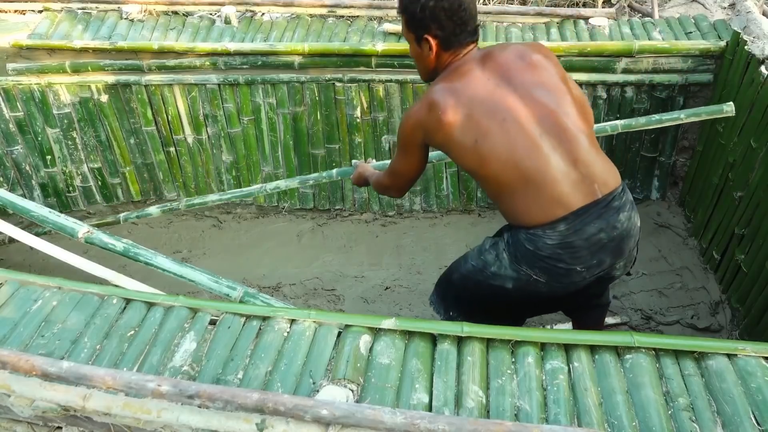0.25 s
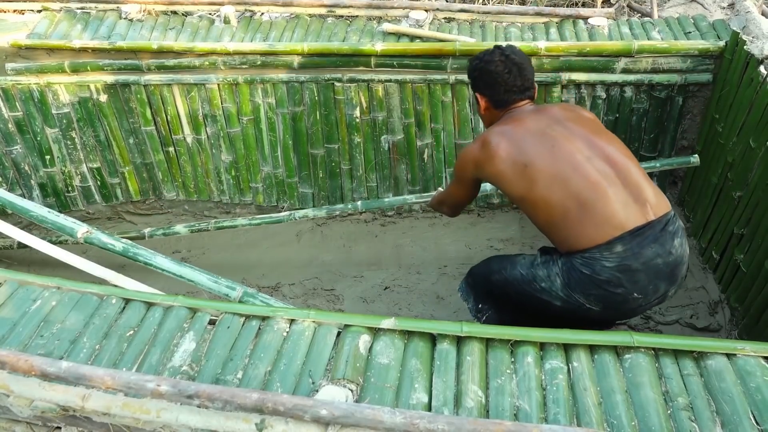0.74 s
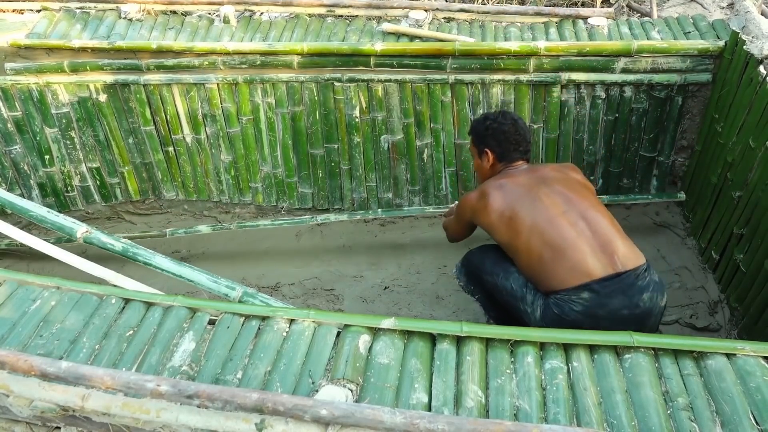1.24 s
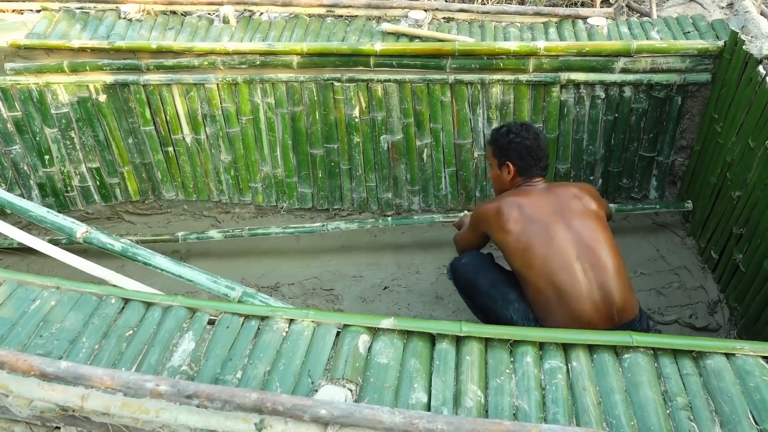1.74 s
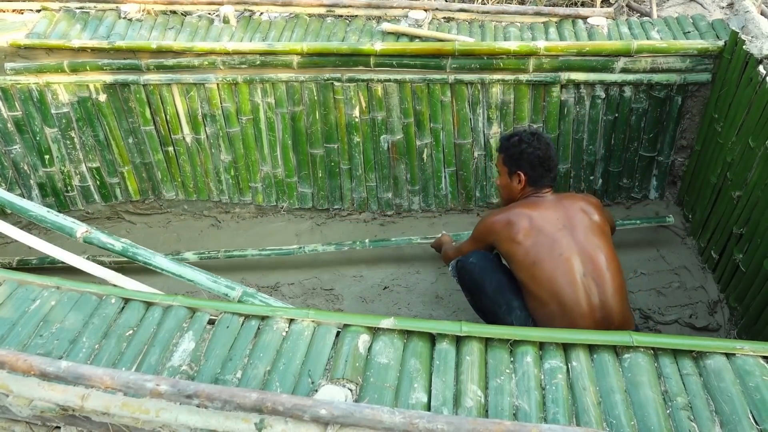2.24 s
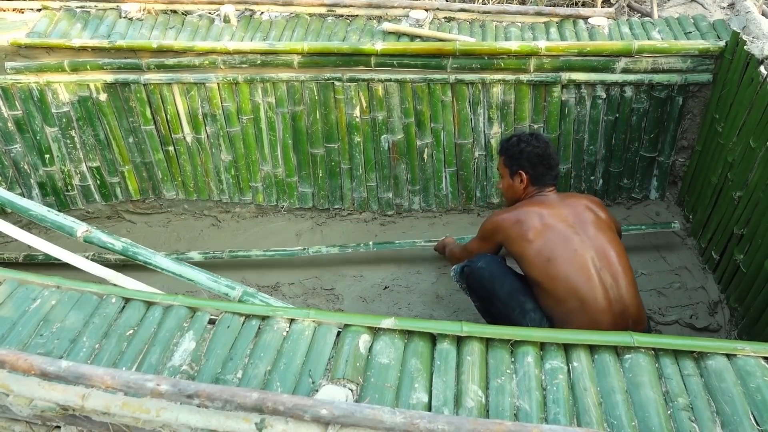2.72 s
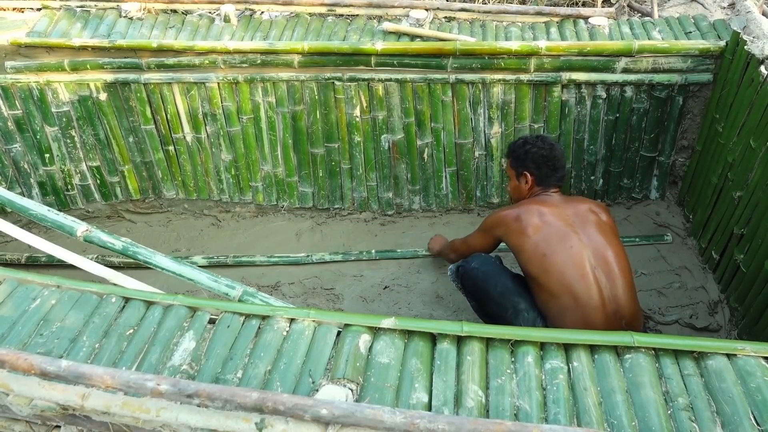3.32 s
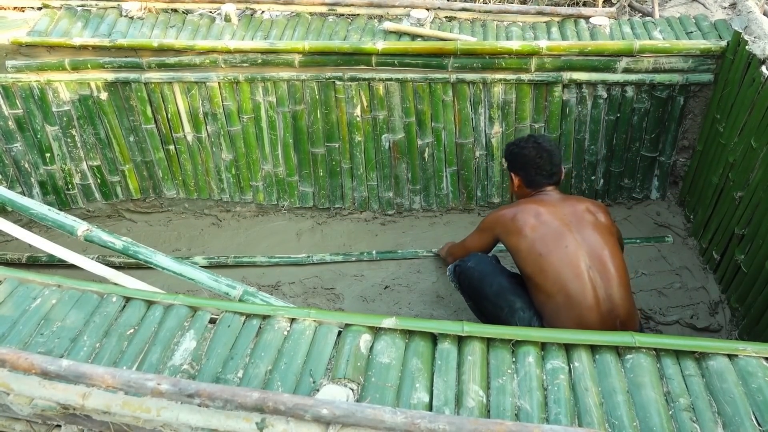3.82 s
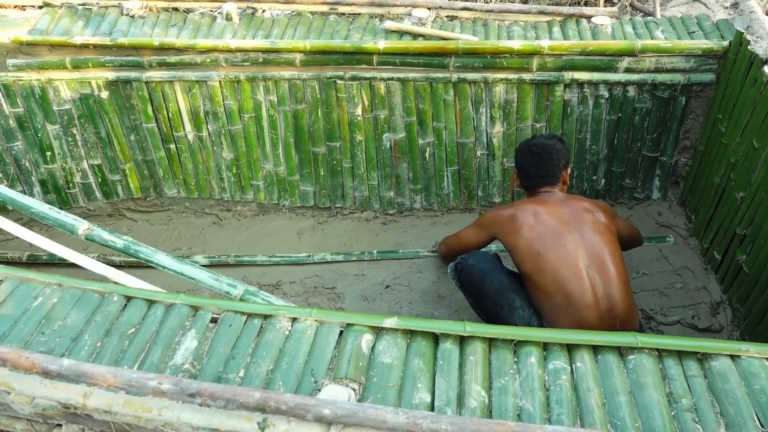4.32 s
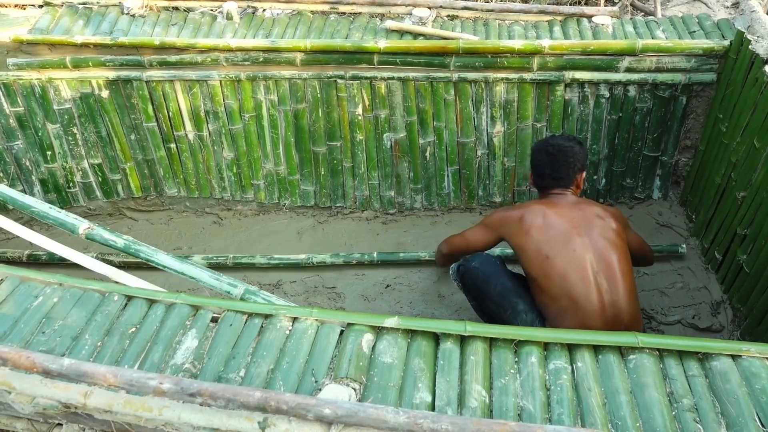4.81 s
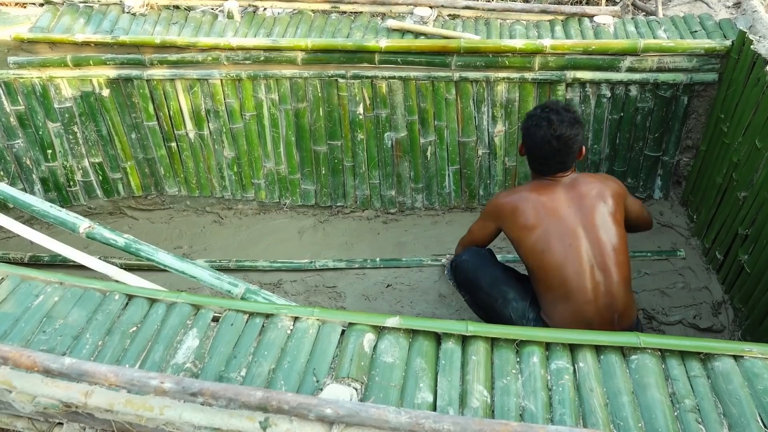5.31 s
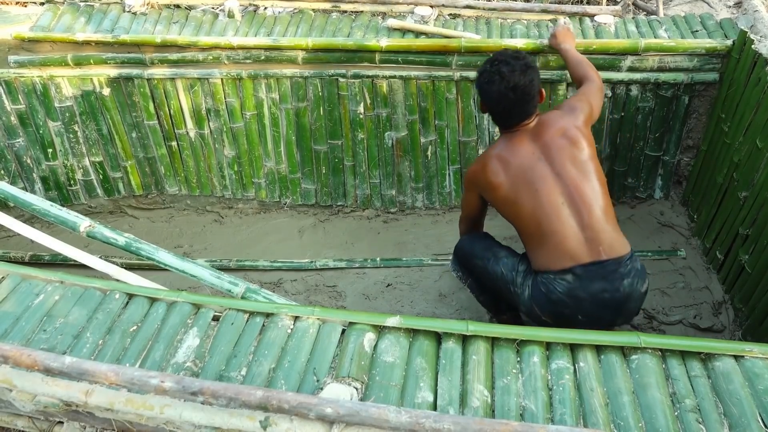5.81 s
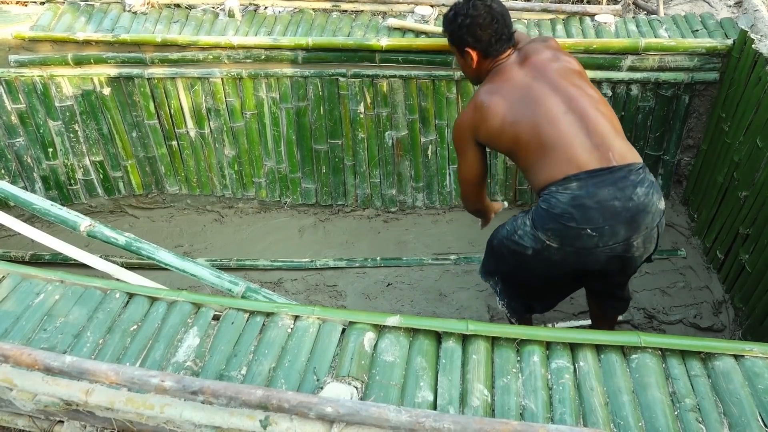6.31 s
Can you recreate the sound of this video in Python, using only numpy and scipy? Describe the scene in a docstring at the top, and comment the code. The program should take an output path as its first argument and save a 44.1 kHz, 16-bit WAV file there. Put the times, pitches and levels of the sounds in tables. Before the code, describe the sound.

Outdoors, very close, a bamboo pole is lowered into a bamboo-lined earth pit. Sharp hollow knocks crack and die at once, with short rattles against slats. Gritty scuffing builds after the first second and continues between blows, then thins while strong single knocks come more widely spaced. Soft wind rumble and faint hiss lie underneath; the hardest blows slightly overload the microphone.

```python
"""Bamboo pole laid in an earth pit

Outdoors, a long bamboo pole goes down in a pit lined with split bamboo: blows ring its modes, it shudders
on the slats, scuffs over dry soil as shaped noise, and some blows boom the hollow lining as low sines.
Wind rumbles on the microphone over a far wash and hiss, all filtered noise; midway a soft band swells
and a faint thin whistle passes. The hardest blows clip the input."""
import sys
import numpy as np
from scipy import signal
from scipy.fft import rfft, irfft, next_fast_len
from scipy.io import wavfile
from scipy.ndimage import uniform_filter1d, map_coordinates

SR = 44100
rng = np.random.default_rng(int(sys.argv[2]) if len(sys.argv) > 2 else 0)


def persist_wave(psi):
    """Save psi, clipped to +-1, as 16-bit WAV."""
    counts = np.round(np.clip(psi, -1, 1) * 32767).astype(np.int16)
    wavfile.write(sys.argv[1], SR, np.atleast_2d(counts).T)


N = 288855  # length [samples]

# Wind on the microphone, spectrum: (frequency [Hz], relative density [dB per Hz])
RUMBLE_SPECTRUM = [(15, -5.5), (30, 1.5), (42, -8), (60, -14.5), (130, -27.5), (400, -71)]
# Far outdoor wash, spectrum: (frequency [Hz], relative density [dB per Hz])
WASH_SPECTRUM = [(70, -39), (130, -1.5), (330, -4.5), (480, -1), (700, -5), (950, -7), (1800, -31)]
# Far wash, level before its random drift: (time [s], level [dB])
WASH_LEVEL = [(0, -46), (.6, -49), (3.1, -47), (3.9, -44.5), (4.1, -46), (5.6, -46), (5.9, -46),
              (6.2, -50.5)]
# Hiss, spectrum: (frequency [Hz], relative density [dB per Hz])
HISS_SPECTRUM = [(200, -9), (600, -8), (1500, -8.5), (3300, -9.5), (6000, -11.5), (8500, -13),
                 (11000, -20.5), (16000, -28)]
# Hiss, fuller while the pole is dragged, level before its random drift: (time [s], level [dB])
HISS_LEVEL = [(0, -46.5), (1.2, -43.5), (1.7, -42.5), (2.3, -43.5), (2.5, -40.5), (2.95, -39), (3.1, -43),
              (3.6, -41), (4.2, -44), (6.55, -45.5)]
# Blows of the pole on the lining: (time [s], ring peak [dB], ring [Hz], second ring [Hz],
# sharpness [dB], shudder re ring [dB], shudder's low zone re its middle [dB], shudder's middle t60 [s])
BLOWS = [(0.027, -30.5, 2280, 3120, 3, -23, -0.5, 0.057), (0.04, -27.5, 2427, 1510, -4, -17, 10, 0.058),
         (0.2147, -24, 2445, 1240, 0, -28, 17, 0.23), (0.3502, -5, 3796, 2150, -4.5, -15.5, 4.5, 0.13),
         (0.7247, 3.5, 1230, 2250, 3, -30.5, 15.5, .15), (0.8506, -29.5, 5730, 2600, 15.5, -23, 20, 0.11),
         (0.9012, -18.5, 778, 1280, -12, -22.5, 16, 0.14), (1.374, -21, 2880, 8300, 2, -24.5, 4, 0.44),
         (1.4627, -17.5, 3070, 980, 8.5, -20.5, 4, 0.11), (1.4934, 2, 590, 306, -19, -24, 18.5, 0.098),
         (1.881, -13.5, 9500, 4730, 8.5, -37, 26.5, 0.27), (1.9625, 3.5, 2090, 970, -6, -27.5, 7.5, 0.21),
         (2.013, -11.5, 808, 2070, -8, -26, 5, 0.28), (2.6331, -2.5, 2074, 4030, 0.5, -27, 13.5, .12),
         (2.8324, 0.5, 2007, 1000, 0, -26, 15, 0.18), (3.7279, 2.5, 2078, 4690, 3, -31, 12, 0.24),
         (4.2309, 4.5, 2046, 3680, 6.5, -33.5, 11.5, 0.27), (4.261, -2.5, 2200, 1197, -10, -45, -10, 0.65),
         (4.4748, 3.5, 2104, 4400, 6, -32, 6.5, 0.3), (5.0247, 4.5, 2292, 883, -3, -27.5, 11.5, 0.22),
         (5.0666, -4, 2136, 5040, -1.5, -33.5, 6, 0.38), (5.3836, 4.5, 2383, 4690, 0, -29.5, 8, 0.31),
         (5.416, -15.5, 4870, 2450, 3, -37, 0, 0.17), (5.776, -30.5, 5760, 2930, 7, -15, -3, 0.1),
         (6.121, -27, 3115, 517, 6.5, -33.5, 30, 0.14), (6.2109, 1, 2294, 1070, 10.5, -32.5, 13, .23),
         (6.3315, -27, 3620, 2150, 11.5, -32, 15, .2), (6.4122, -16.5, 374, 970, -7, -17.5, 23.5, 0.12),
         (6.481, 3.5, 2760, 1010, 2.5, -29.5, 10, 0.28), (6.4996, -8.5, 1007, 450, -9, -24, 10.5, 0.17)]
# Modes of the pole: (frequency [Hz], width [Hz], relative level [dB])
POLE_MODES = [(186, 160, -5), (348, 127, 0.5), (492, 109, 3), (639, 355, 3), (813, 290, 5),
              (1019, 260, 5.5), (1325, 556, 8.5), (1712, 780, 7.5), (2148, 290, 6.5), (2437, 265, 3),
              (3000, 470, -0.5), (3220, 300, 6.5), (3510, 1140, 2.5), (4160, 980, 3.5), (4820, 1540, -2),
              (6320, 1220, -7.5), (8510, 890, -10), (11500, 3800, -29)]
# Swell of a shudder in the low, middle and treble zones: one row each, (share of its t60 [ratio])
SHUDDER_BUILD_SHARES = [
    [0.047],
    [0.02],
    [0.095],
]
# Scuffs on soil and lining: (start [s], level [dB], loudest [Hz], treble grit re level [dB], length scale [s])
SCUFF_STROKES = [(0.261, -42.5, 2350, 4, 0.18), (0.428, -40, 4140, 3, 0.058),
                 (0.499, -44.5, 3160, 6, 0.054), (0.858, -39.5, 4400, 7, 0.042), (1.009, -39, 2770, 7, 0.1),
                 (1.134, -32.5, 2870, 4, 0.11), (1.226, -27.5, 2880, 3, 0.088),
                 (1.326, -36, 4480, 7, 0.061), (1.539, -31.5, 2930, -5, 0.0076),
                 (1.703, -42.5, 2930, 6.5, 0.037), (1.781, -36.5, 5660, 7.5, 0.17),
                 (1.886, -28, 3420, -16, 0.055), (2.088, -38, 2820, -26, .055),
                 (2.189, -31, 7900, 2.5, 0.025), (2.288, -35.5, 3140, 1.5, 0.021),
                 (2.32, -40, 3080, 3, .011), (2.389, -39.5, 3100, 4.5, 0.052),
                 (2.457, -40, 3380, 7.5, 0.051), (2.509, -32.5, 2960, 5.5, 0.048),
                 (2.561, -42.5, 5600, 11, 0.12), (2.674, -35.5, 4050, 6.5, 0.044),
                 (2.761, -35.5, 3260, 5.5, 0.0089), (2.787, -31.5, 5800, 6, 0.019),
                 (2.897, -30.5, 1400, -9, 0.029), (2.961, -38, 3740, 6, .041),
                 (3.151, -44.5, 8140, 8, 0.05), (3.239, -38, 3580, 4.5, 0.067), (3.595, -46, 5700, 8, 0.13),
                 (3.945, -37, 3160, -17, .035), (4.776, -40, 3470, -1, 0.11),
                 (4.867, -39, 3470, 0.5, 0.085), (4.936, -36, 3130, 2.5, 0.11),
                 (5.542, -37, 3460, -21, 0.039), (5.81, -43, 5900, 0, 0.02)]
# Soil under the pole, spectrum: (frequency [Hz], relative density [dB per Hz])
SOIL_SPECTRUM = [(180, -43), (300, -5), (502, -9), (787, -3.5), (1580, -6), (2070, -5.5), (3190, -5),
                 (5000, -7.5), (6900, -12), (8500, -9.5), (10500, -19), (14500, -23.5), (16000, -28)]
# Hollow booms of the lining: (time [s], frequency [Hz], level before swell and fade [dB], t60 [s])
LINING_BOOMS = [(0.363, 168.4, -23.5, 0.22), (0.903, 588, -25, .12), (1.495, 103.3, -22, 0.37),
                (2.637, 467, -15.5, 0.055), (2.835, 322, -16.5, 0.18), (3.736, 434, -21.5, 0.1),
                (5.028, 256, -30, 0.2), (5.40, 134, -32, 0.3), (6.415, 160, -14, 0.13)]
# Soft band of noise that swells and stops: (time [s], level [dB])
SWELL_LEVEL = [(3.2, -70), (3.55, -45.5), (3.94, -40.5), (4.02, -49), (4.1, -97)]

WIND_DB = -38.5  # before its random lumps
SECOND_DB = -3.5  # pull of the second ring under the first
# Ring t60 of a 0 dB blow at 2000 Hz, away from its two pitches; a harder blow rings shorter [s per dB]
RING_T60_S, HARD_SHORTENS_S = 0.023, 0.001
PITCH_LINGERS = 0.12  # how much longer the modes at the two pitches ring [ratio]
SHUDDER_TREBLE_DB = 12.5  # treble of the shudder over the sharpness of the blow
SHUDDER_HOLD_SHARE = 0.087  # hold of a shudder, as a share of its t60
SHUDDER_TOP_HZ = 10400  # the chatter is dull above this
SCUFF_RISE_S, SCUFF_WEIGHT_DB = 0.002, -1  # shortest swell; low zone of a scuff re its middle
SCUFF_T60_S, LOUD_LINGERS_S = 0.061, 0.008  # fade of a -41 dB scuff; a louder one fades longer [s per dB]
SWELL_HZ, SWELL_WIDTH_HZ = 720, 200
WHISTLE_PEAK_S, WHISTLE_DB, WHISTLE_T60_S = 4.02, -52.5, 1
WHISTLE_RISE_S = 0.05  # time to climb the last 20 dB
TOP_HZ = 16000


def amp(db):
    """Gain of a level in dB."""
    return 10 ** (np.asarray(db) / 20)


def unit(x):
    """Scaled to rms 1."""
    return x / np.sqrt(np.mean(x ** 2) + 1e-20)


def along(points, hz):
    """Values of (Hz, value) points, read on a log frequency axis."""
    f, v = np.transpose(points)
    return np.interp(np.log(hz + 1), np.log(f + 1), v)


def over_time(points):
    """Values of (s, value) points at every sample."""
    return np.interp(np.arange(N) / SR, *np.transpose(points))


def wobble(rate):
    """A smooth random curve with rate knots a second."""
    knots = rng.standard_normal(int(N * rate / SR) + 4)
    return map_coordinates(knots, [np.arange(N) * rate / SR])


def filtered(x, response):
    """x times a response of frequency, padded so that its tail does not wrap."""
    m = next_fast_len(N + SR // 2)
    return irfft(rfft(x, m) * response(np.fft.rfftfreq(m, 1 / SR)), m)[..., :N]


def coloured_noise(spectrum):
    """Steady noise of rms 1 with the given density in dB."""
    return unit(filtered(rng.standard_normal(N), lambda f: amp(along(spectrum, f))))


def band_noise(centre_hz, width_hz):
    """Steady noise of rms 1 gathered around one frequency."""
    return unit(filtered(rng.standard_normal(N), lambda f: 1 / (1 + ((f - centre_hz) / width_hz) ** 2)))


def zones(hz, low_hz, high_hz):
    """Shares of the low, middle and high zones of the spectrum."""
    low = 1 / (1 + (hz / low_hz) ** 4)
    high = 1 / (1 + (high_hz / (hz + 1)) ** 4)
    return np.array([low, np.clip(1 - low - high, 0, 1), high])


def strokes(rows, colour, split, bump_db, ripple_db, grain_db):
    """Grainy contact noise, new for each row (s, loudest Hz, low dB, middle dB, high dB, rise, hold, t60)."""
    out, t = np.zeros(N + SR), np.arange(2 ** 14) / SR
    hz = np.fft.rfftfreq(len(t), 1 / SR)
    body, parts = colour(hz), split(hz)
    grains = amp(grain_db * wobble(600))
    for s, loud_hz, *zone_db, rise, hold, t60 in rows:
        # where this contact sings
        bump = amp(bump_db * np.exp(-(np.log(hz / loud_hz + 1e-9) / 0.18) ** 2))
        # narrow resonances of the slats touched
        ripple = unit(uniform_filter1d(rng.standard_normal(len(hz)), size=45))
        spectrum = rfft(rng.standard_normal(len(t))) * body * bump * amp(ripple_db * ripple)
        zone_noise = irfft(spectrum * parts) / np.std(irfft(spectrum))
        lives = max(t60, 0.01) * np.array([[1.3], [1], [0.8]])  # the treble dies first
        fade = amp(-60 * np.maximum(t - np.min(rise) - hold, 0) / lives)
        shape = np.clip(t / rise, 0, 1) * fade
        out[round(s * SR):][:len(t)] += amp(zone_db) @ (zone_noise * shape)
    return out[:N] * grains


def wind():
    """Wind rumbles on the microphone, its low noise buffeting in random lumps."""
    return amp(WIND_DB + wobble(6)) * coloured_noise(RUMBLE_SPECTRUM)


def wash():
    """The far outdoor wash, dull noise whose level drifts."""
    return amp(over_time(WASH_LEVEL) + wobble(12)) * coloured_noise(WASH_SPECTRUM)


def hiss():
    """Broad hiss, fuller while the pole is dragged."""
    return amp(over_time(HISS_LEVEL) + 0.5 * wobble(15)) * coloured_noise(HISS_SPECTRUM)


def knocks():
    """Each blow cracks and briefly rings the modes of the pole, most near the contact's two pitches."""
    out, t = np.zeros(N + SR), np.arange(SR // 8)[:, None] / SR
    free_hz, _, mode_db = np.transpose(POLE_MODES)
    press = 1 - np.exp(-(t / 0.0009) ** 2)  # the contact builds up over about a millisecond
    crack_band = signal.butter(2, [3000, 10000], 'band', fs=SR, output='sos')
    for s, db, ring_hz, second_hz, sharp_db, *_ in BLOWS:
        # grip and contact point shift the modes a little
        hz = free_hz * ring_hz / free_hz[np.abs(free_hz - ring_hz).argmin()]
        hz[np.abs(hz - second_hz).argmin()] = second_hz
        near_ring, near_second = [np.exp(-(np.log(hz / pitch) / 0.23) ** 2) for pitch in (ring_hz, second_hz)]
        size = near_ring + amp(SECOND_DB) * near_second + amp(mode_db - 13)
        size = size * amp(2 * rng.standard_normal(len(hz)))
        life = max(RING_T60_S - HARD_SHORTENS_S * db, 0.004) * (2000 / hz) ** 0.14  # low modes last longer
        life = life * (1 + PITCH_LINGERS * np.maximum(near_ring, near_second))
        tones = np.sin(2 * np.pi * (hz * t + rng.random(len(hz))))
        ring = (size * amp(-60 * t / life) * press * tones).sum(1)
        crack_shape = (amp(-60 * t / 0.014) * press)[:, 0]
        crack = signal.sosfilt(crack_band, rng.standard_normal(len(t))) * crack_shape
        blow = ring / np.abs(ring).max() + amp(sharp_db - 3.5) * crack
        out[round(s * SR):][:len(t)] += amp(db) * blow
    return out[:N]


def pole_response(f):
    """Resonances of the pole, summed with alternating sign and dulled at the top."""
    total = 0
    for k, (centre, width, db) in enumerate(POLE_MODES):
        damping = 1j * f * width
        total = total + (-1) ** k * amp(db) * damping / (centre * centre - f * f + damping)
    return total / (1 + (f / SHUDDER_TOP_HZ) ** 2)


def shudder():
    """After a blow the pole chatters on the slats, which keeps feeding its modes, most near the second ring."""
    rows = []
    for s, db, _, second_hz, sharp_db, after_db, hollow_db, t60 in BLOWS:
        middle_db = db + after_db
        treble_db = middle_db + sharp_db + SHUDDER_TREBLE_DB
        rise = np.multiply(SHUDDER_BUILD_SHARES, t60)  # the treble builds up last
        rows.append((s, second_hz, middle_db + hollow_db, middle_db, treble_db, rise, SHUDDER_HOLD_SHARE * t60, t60))
    return strokes(rows, pole_response, lambda f: zones(f, low_hz=716, high_hz=4080),
                   bump_db=3.0, ripple_db=2.2, grain_db=2.0)


def scuffs():
    """Pole, hands and feet drag over grit in short strokes of noise; a long stroke starts more gently."""
    rows = []
    for s, db, loud_hz, grit_db, length in SCUFF_STROKES:
        rise = SCUFF_RISE_S + 0.2 * length
        t60 = SCUFF_T60_S + LOUD_LINGERS_S * (db + 41)
        rows.append((s, loud_hz, db + SCUFF_WEIGHT_DB, db, db + grit_db, rise, 0.6 * length, t60))
    return strokes(rows, lambda f: amp(along(SOIL_SPECTRUM, f)), lambda f: zones(f, low_hz=1790, high_hz=5560),
                   bump_db=4.5, ripple_db=2.9, grain_db=1.5)


def booms():
    """Some blows shake the lining: one low mode each, swelling over a few cycles, then dying away."""
    out, t = np.zeros(N + SR), np.arange(SR // 2) / SR
    for s, hz, db, t60 in LINING_BOOMS:
        swell = 1 - np.exp(-t * hz / 1.1)
        out[round(s * SR):][:len(t)] += amp(db - 60 * t / t60) * swell * np.sin(2 * np.pi * hz * t)
    return out[:N]


def soft_swell():
    """A soft band of noise swells and stops."""
    return amp(over_time(SWELL_LEVEL)) * band_noise(SWELL_HZ, SWELL_WIDTH_HZ)


def whistle():
    """A faint thin whistle passes: narrow noise that climbs fast and fades slowly."""
    since = np.arange(N) / SR - WHISTLE_PEAK_S
    drop_db = np.where(since < 0, -20 * since / WHISTLE_RISE_S, 60 * since / WHISTLE_T60_S)
    return amp(WHISTLE_DB - drop_db) * band_noise(2190, 50)


def scene():
    """The pole in its pit, close, over the outdoor air."""
    air = wind() + wash() + hiss() + soft_swell() + whistle()
    pole = knocks() + shudder() + scuffs() + booms()
    return (air + pole)[None]


def record(dry):
    """The input clips just under full scale with a narrow knee; nothing is kept above the band limit."""
    clipped = dry / (1 + np.abs(dry / 0.98) ** 12) ** (1 / 12)
    return filtered(clipped, lambda hz: hz < TOP_HZ)


dry = scene()
out = record(dry)
persist_wave(out)
```